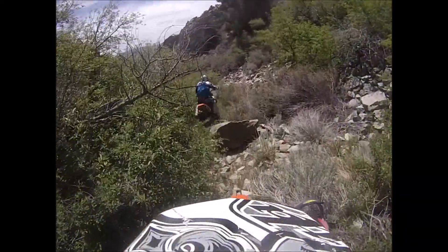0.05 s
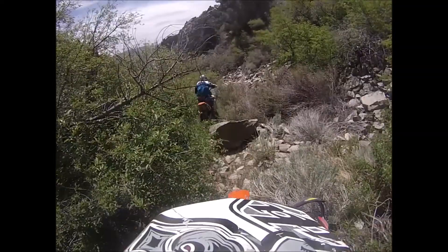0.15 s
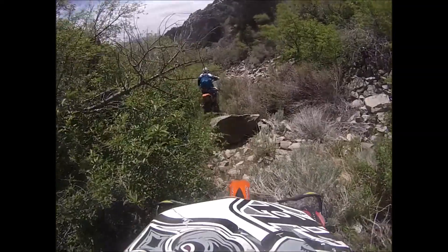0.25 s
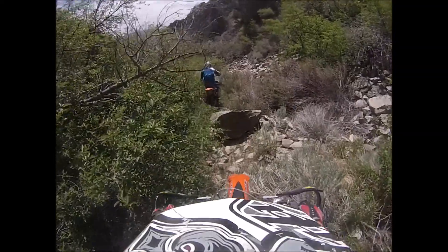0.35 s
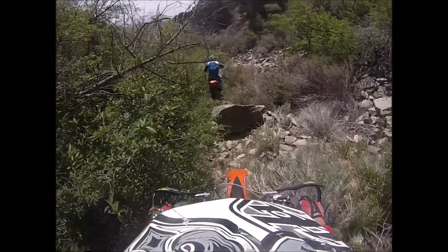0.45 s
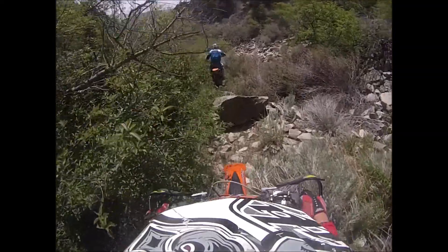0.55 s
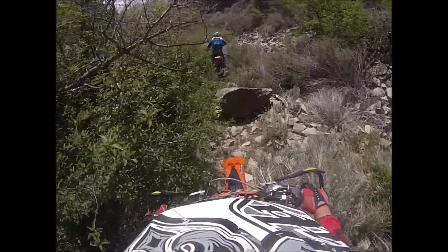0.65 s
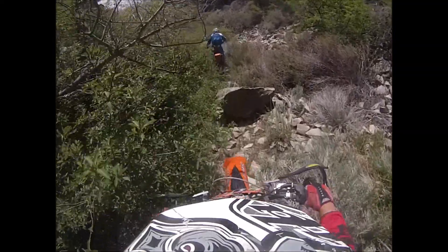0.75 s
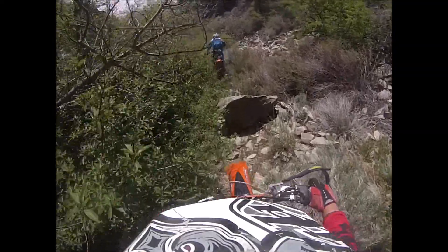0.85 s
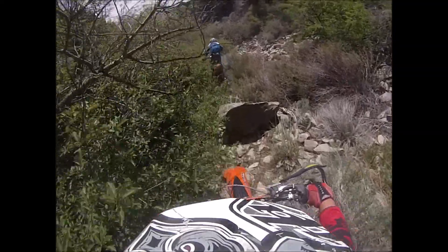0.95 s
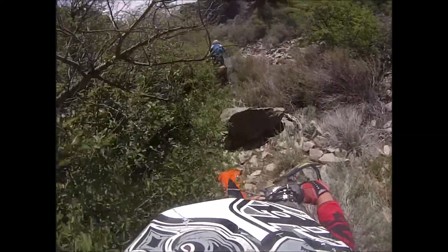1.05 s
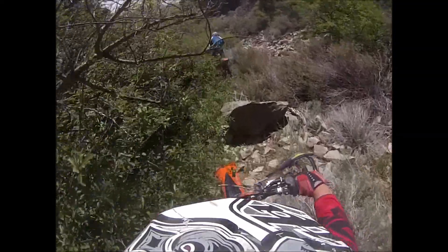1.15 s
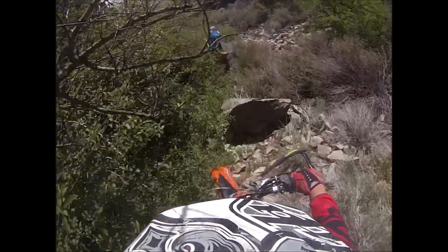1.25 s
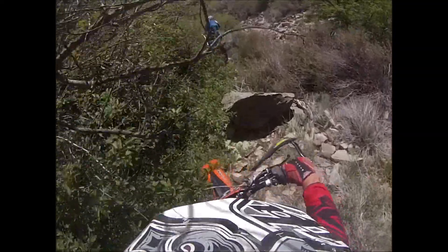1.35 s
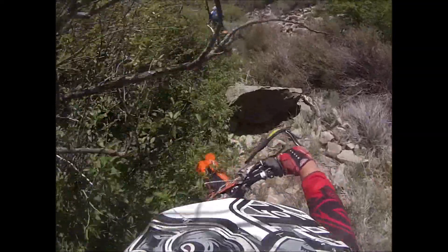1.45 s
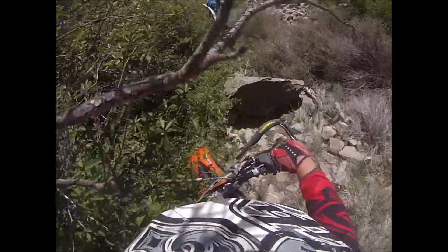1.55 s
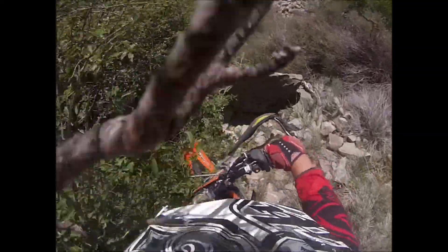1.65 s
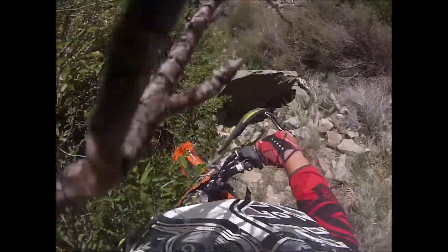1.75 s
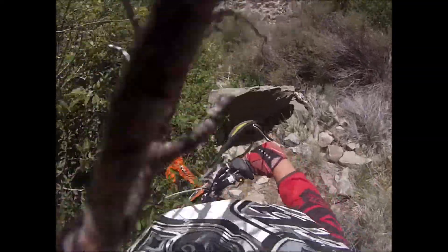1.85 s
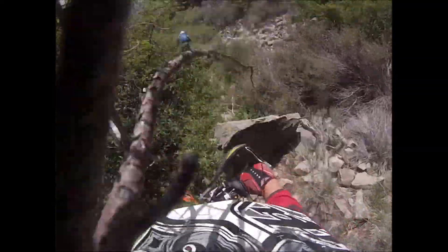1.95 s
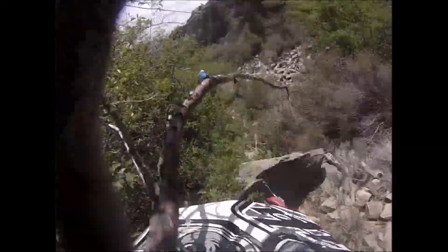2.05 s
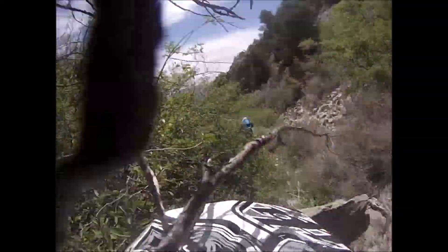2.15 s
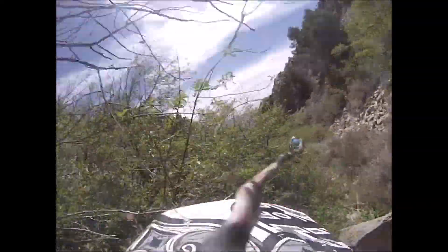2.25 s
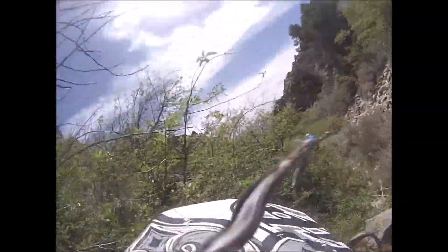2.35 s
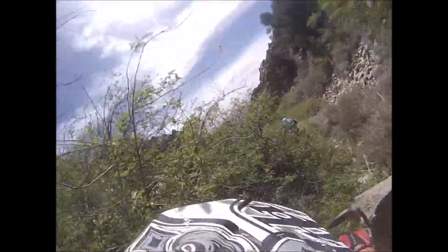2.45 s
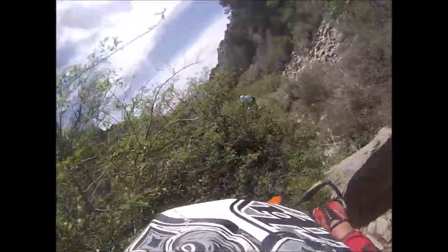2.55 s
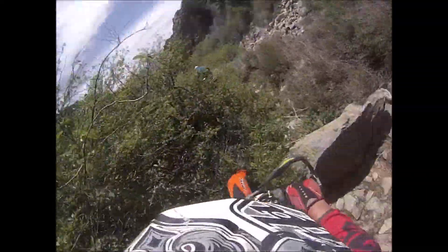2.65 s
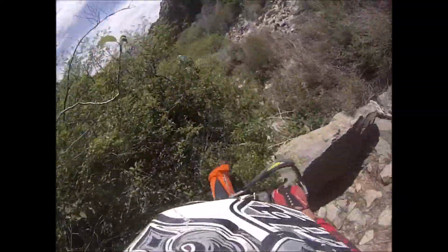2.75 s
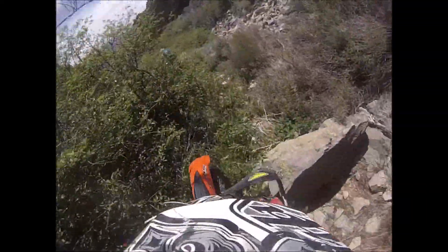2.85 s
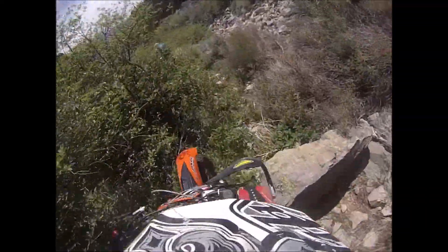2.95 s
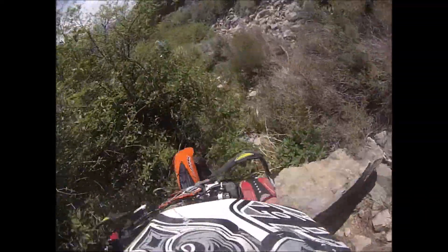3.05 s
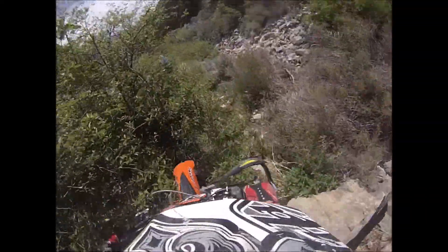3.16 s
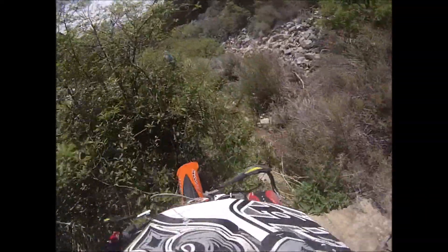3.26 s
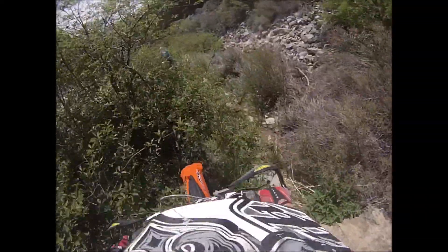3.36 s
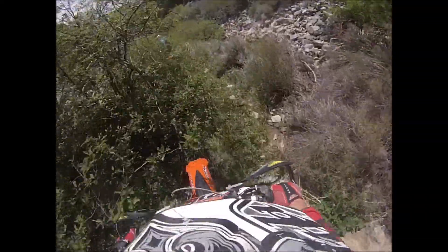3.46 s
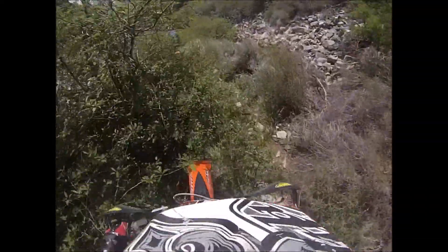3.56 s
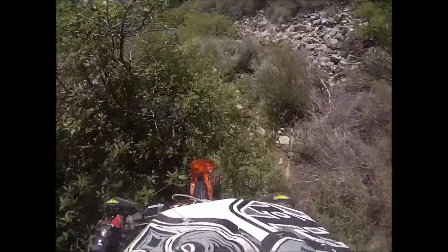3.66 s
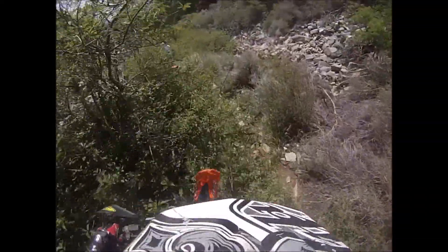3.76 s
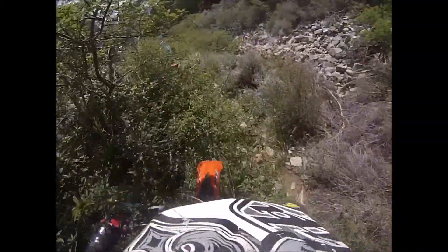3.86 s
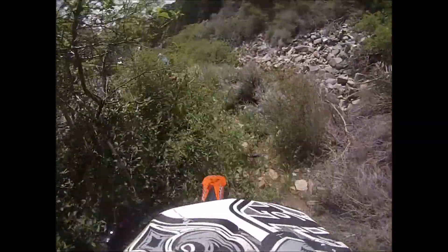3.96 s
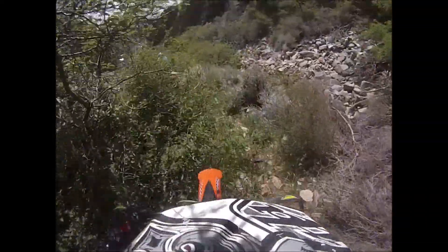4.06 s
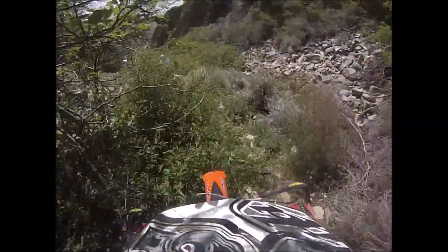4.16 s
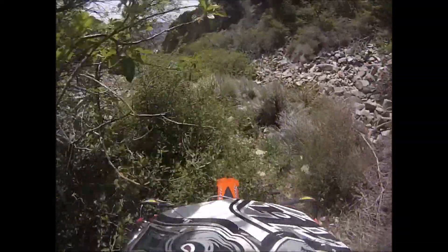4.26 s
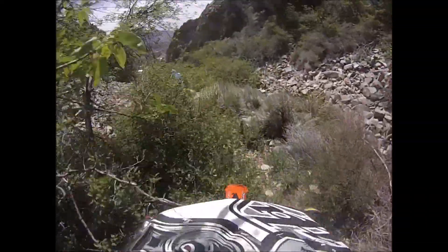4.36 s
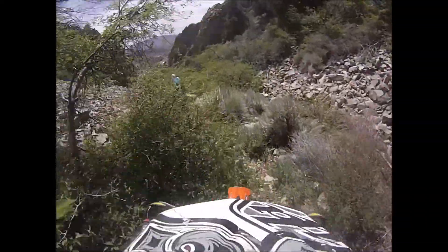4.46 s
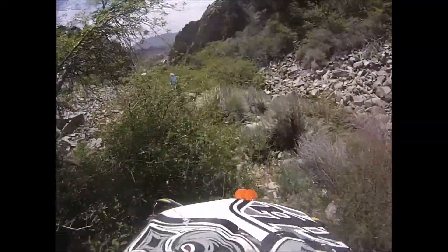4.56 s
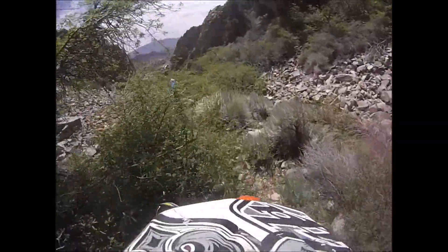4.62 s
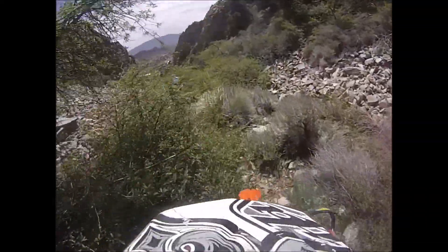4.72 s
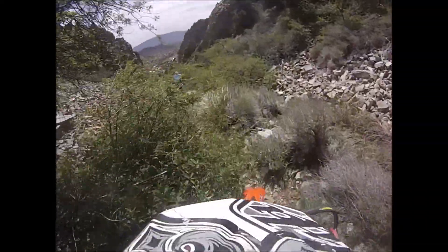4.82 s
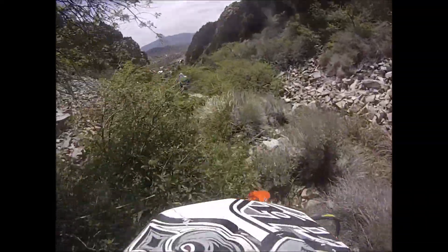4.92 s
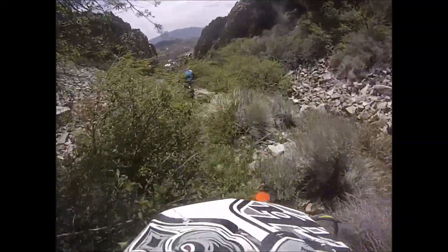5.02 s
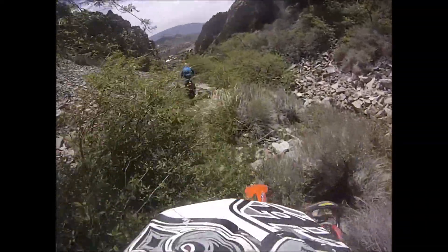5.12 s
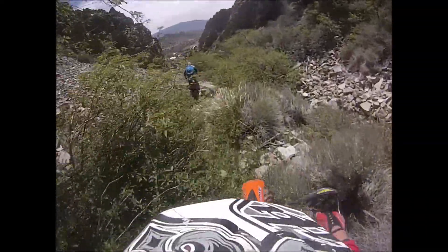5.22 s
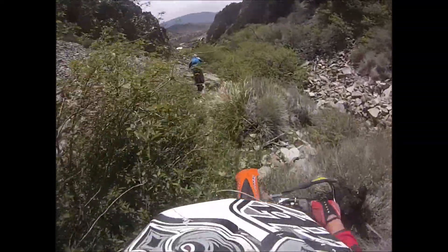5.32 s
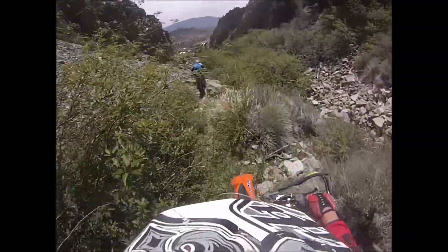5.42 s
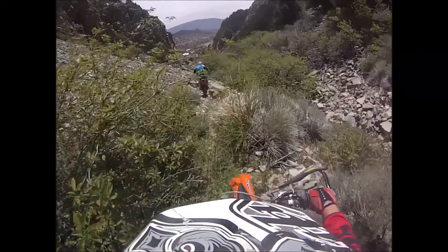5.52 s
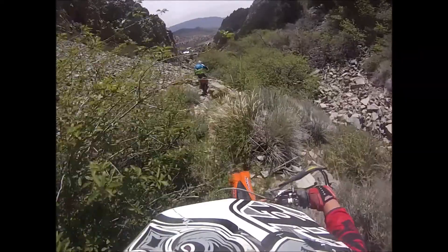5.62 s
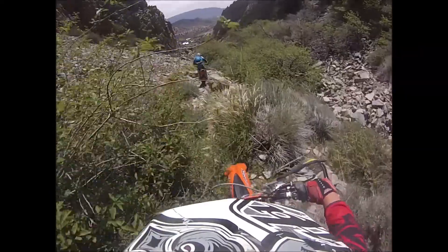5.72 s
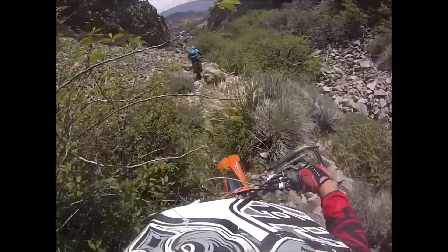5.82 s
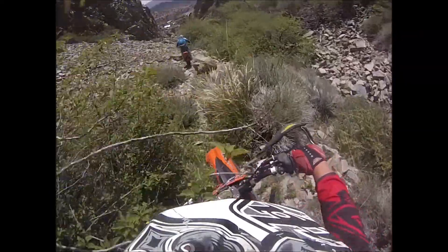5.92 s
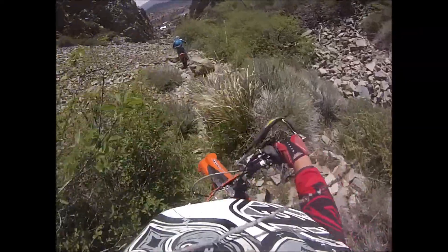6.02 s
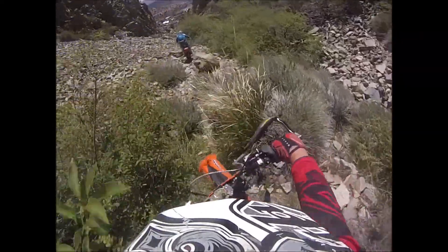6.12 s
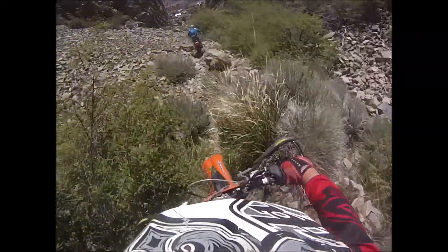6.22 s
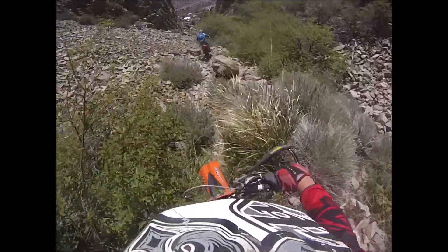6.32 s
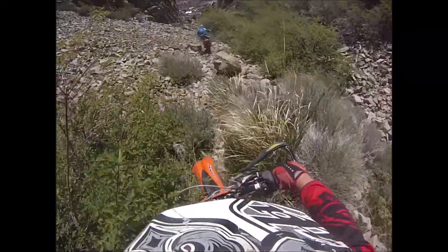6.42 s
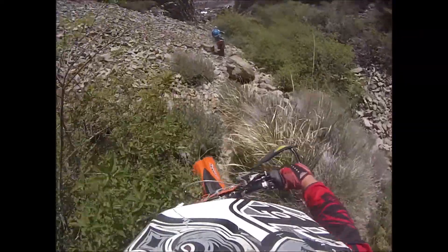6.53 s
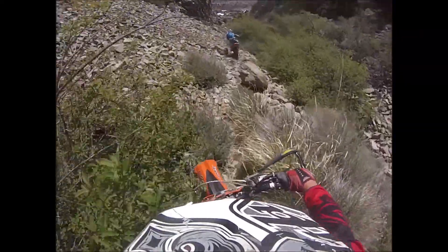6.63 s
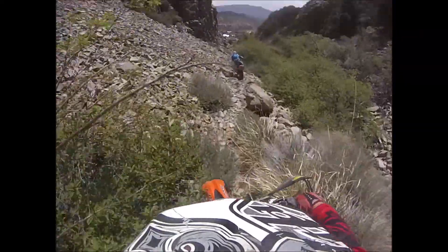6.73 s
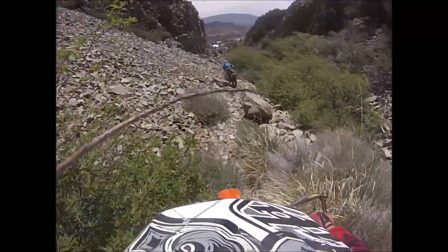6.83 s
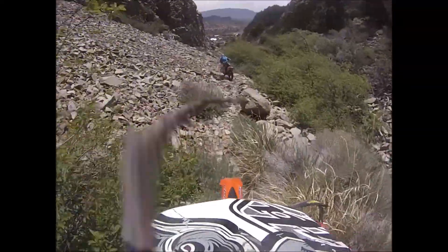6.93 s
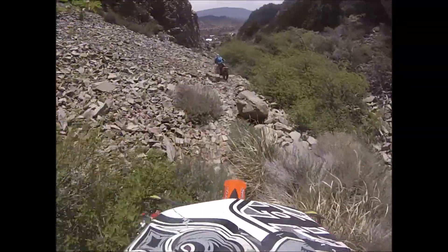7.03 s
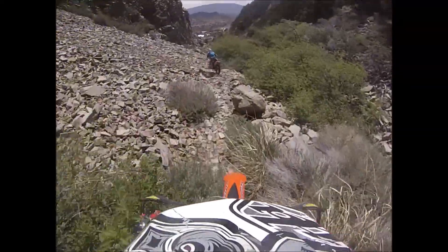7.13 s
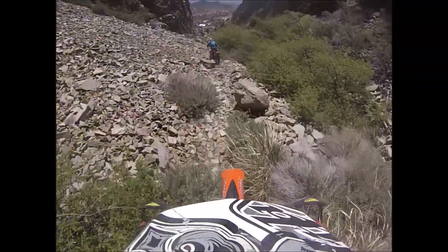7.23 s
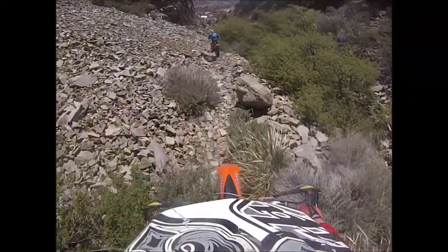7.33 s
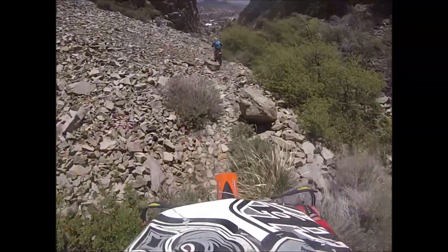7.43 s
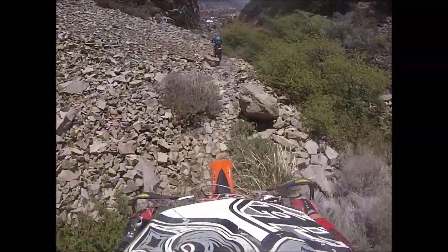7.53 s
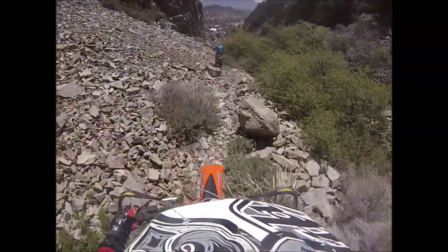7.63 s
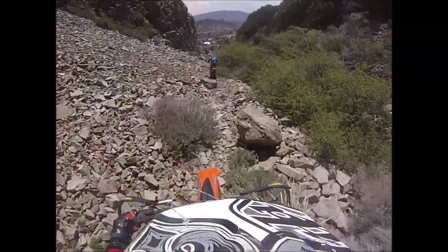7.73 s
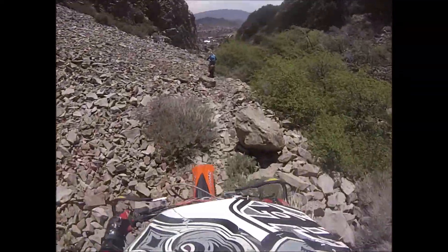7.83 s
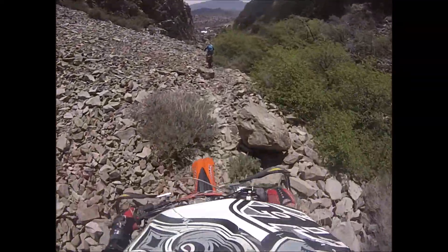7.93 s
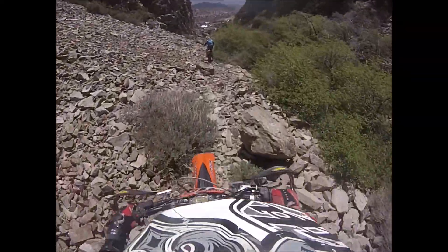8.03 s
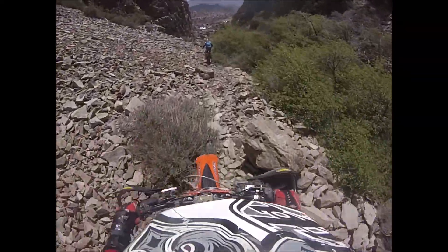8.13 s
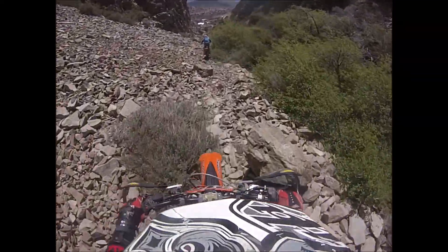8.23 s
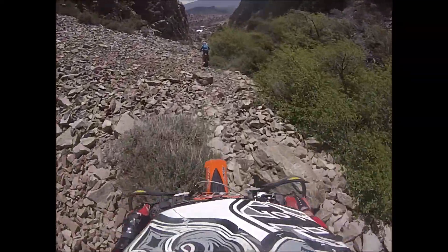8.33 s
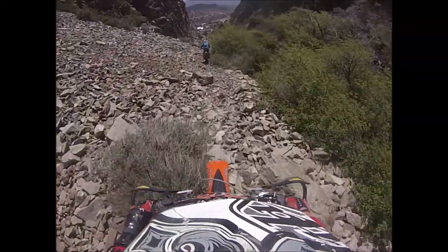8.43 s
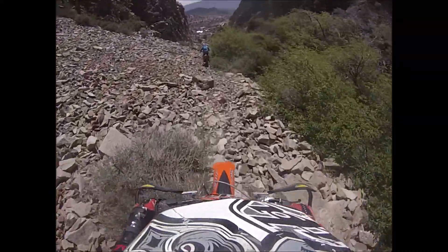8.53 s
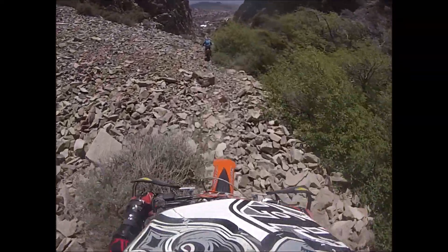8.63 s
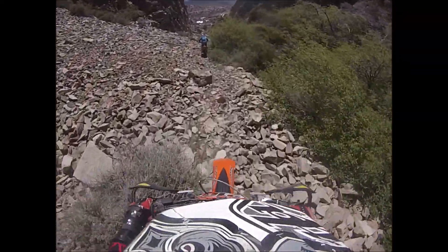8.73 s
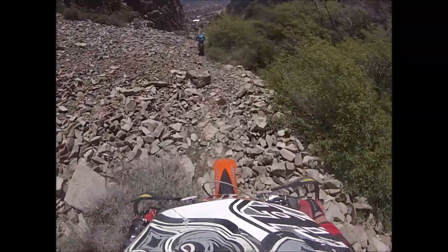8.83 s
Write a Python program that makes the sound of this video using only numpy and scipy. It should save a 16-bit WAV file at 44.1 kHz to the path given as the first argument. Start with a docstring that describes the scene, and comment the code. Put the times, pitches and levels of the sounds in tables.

```python
"""On an overgrown rocky trail, a two-stroke dirt bike creeps along, heard from a camera on the rider's helmet.
The engine burbles on short blips of throttle and pops unevenly: pulses ring its pipe and noise its casing.
Branches knock, thud and scrape on helmet and camera housing: short contacts ring them, or make them judder.
Leaves swish past as shaped noise with tiny snaps, small stones and loose metal tick, and air buffets the mic."""
import sys
import numpy as np
from scipy import signal
from scipy.fft import rfft, irfft
from scipy.io import wavfile
from scipy.ndimage import uniform_filter1d, minimum_filter1d

SR = 44100
rng = np.random.default_rng(int(sys.argv[2]) if len(sys.argv) > 2 else 0)


def dump_mix(stems):
    """Bounce the given channels to the path in sys.argv[1] as a 16-bit WAV at rate SR."""
    frames = np.atleast_2d(stems).T  # one column per channel
    limited = np.clip(frames, -1, 1)  # hard clip at full scale
    pcm = np.round(limited * 32767).astype(np.int16)
    wavfile.write(sys.argv[1], SR, pcm)


N = 391608
TIME = np.arange(N) / SR


def from_db(db):
    """Turn decibels into a gain."""
    return 10 ** (np.asarray(db) / 20)


def to_db(gain):
    """Turn a gain into decibels."""
    return 20 * np.log10(gain + 1e-9)


def rms_one(x):
    """Scale a sound to unit power."""
    return x / np.sqrt(np.mean(x ** 2) + 1e-20)


def passed(x, hz, kind, order=2):
    """Keep only what lies below ("low") or above ("high") a frequency."""
    return signal.sosfilt(signal.butter(order, min(hz, .45 * SR), kind, fs=SR, output="sos"), x)


def drift(rate):
    """Random wandering of spread 1, with `rate` new values a second joined by straight lines."""
    return rms_one(np.interp(TIME * rate, np.arange(9000), rng.standard_normal(9000)))


def coloured(spectrum):
    """Noise of unit power shaped by a list of (frequency [Hz], level [dB per Hz])."""
    hz, db = np.transpose(spectrum)
    log_hz = np.log(np.fft.rfftfreq(N, 1 / SR) + 1e-3)
    gain = from_db(np.interp(log_hz, np.log(hz), db))
    return rms_one(irfft(rfft(rng.standard_normal(N)) * gain, N))


def resonate(x, modes):
    """Ring resonances (frequency [Hz], width [Hz], level [dB]) side by side, with alternating sign."""
    out = 0
    for k, (hz, width, db) in enumerate(modes):
        r = np.exp(-np.pi * width / SR)
        poles = [1, -2 * r * np.cos(2 * np.pi * hz / SR), r * r]
        gain = (-1) ** k * from_db(db) * (1 - r * r) / 2
        out = out + gain * signal.lfilter([1, 0, -1], poles, x + 1e-18)
    return out


def evened(x, span_s):
    """Hold the power at 1 over a sliding span."""
    power = uniform_filter1d(x ** 2, max(int(span_s * SR), 2))
    return x / np.sqrt(np.abs(power) + 1e-14)


def add(out, s, sound, peak_db):
    """Place a sound at a time with a given peak."""
    at = max(round(s * SR), 0)
    out[at:at + len(sound)] += (from_db(peak_db) * sound / np.abs(sound).max())[:N - at]


def swells(starts, lengths, heights, attack_s, release_s):
    """Each event rises to its height by its start, holds for its length and dies away; the strongest prevails."""
    out = np.zeros(N)
    for s, length, height in zip(starts, lengths, heights):
        rising = np.maximum(s - TIME, 0) ** 2 * 2 / attack_s ** 2
        falling = np.maximum(TIME - s - length, 0) / release_s
        out = np.maximum(out, height * np.exp(-np.minimum(rising + falling, 40)))
    return out


def bumpy_level(events, column, steady_db, attack_s, release_s):
    """Level in dB of a steady bed with one column of an event table swelling over it."""
    rows = np.transpose(events)
    bumps = swells(rows[0], rows[1], from_db(rows[column]), attack_s, release_s)
    return to_db(np.hypot(from_db(steady_db), bumps))


def ticking(t, ticks_per_s, fade_s):
    """A first contact and a dying run of smaller, uneven ones."""
    happens = rng.random(len(t)) < ticks_per_s / SR
    later = happens * rng.uniform(-0.83, 1, len(t)) * np.exp(-t / fade_s)
    return (t == 0) + later


# blips of throttle: (time [s], length [s], top speed [revolutions per s], exhaust level [dB],
# misfiring added to that of the idling engine [0-1], airbox level [dB])
THROTTLE_BLIPS = [(0, 0.096, 47.2, -62, 0.36, -68), (1.33, 0.32, 41, -44.5, 0.38, -56),
                  (1.7, 0.77, 55.4, -33, 0.4, -72), (2.66, 0.15, 53.5, -46, 0, -39.5),
                  (3.23, .17, 49.1, -41.5, 0.25, -48), (3.56, 0.084, 43.5, -68, 0.2, -54),
                  (3.8, .16, 58.5, -42.5, 0.23, -48.5), (6.02, 0.28, 54, -39.5, .25, -46),
                  (7.135, .2, 48.4, -40.5, 0.31, -55.5), (8.18, 0.21, 44.2, -44, 0.28, -55)]
IDLE_REV_PER_S, COAST_S = 28, .41


def engine_speed():
    """Each blip pulls the engine up to its top speed, fast at first; then it coasts back towards idle."""
    speed = np.full(N, float(THROTTLE_BLIPS[0][2]))
    for s, length, top, *_ in THROTTLE_BLIPS:
        before = np.interp(s, TIME, speed)
        fall = np.exp(-np.maximum(TIME - s - length, 0) / COAST_S)
        coasting = IDLE_REV_PER_S + (top - IDLE_REV_PER_S) * fall
        pulling = before + (top - before) * np.sin(np.pi / 2 * (TIME - s) / length)
        after = np.where(TIME < s + length, pulling, coasting)
        speed = np.where(TIME < s, speed, after)
    return speed


THROTTLE_OPEN_S, THROTTLE_SHUT_S = 0.016, 0.0096
IDLE_DB, DB_PER_REV_PER_S = -55, 0.1774   # exhaust with the throttle shut, and its rise with speed
IDLE_MISFIRING, MISFIRING_FADE_REV_PER_S = 0.46, 14   # firing steadies above idle


def throttle(above_idle):
    """Exhaust level and misfiring follow from the engine's speed and the blips."""
    s, length, _, open_db, stumble, _ = np.transpose(THROTTLE_BLIPS)
    shut = from_db(IDLE_DB + DB_PER_REV_PER_S * above_idle)
    opened = swells(s, length, from_db(open_db), THROTTLE_OPEN_S, THROTTLE_SHUT_S)
    misfiring = swells(s, length, stumble, THROTTLE_OPEN_S, THROTTLE_SHUT_S)
    misfiring = misfiring + IDLE_MISFIRING * np.exp(-above_idle / MISFIRING_FADE_REV_PER_S)
    return to_db(np.hypot(shut, opened)), misfiring


def scattered(x, decay_s=0.007, share=0.6):
    """Ground and rocks nearby add a short cloud of echoes."""
    t = TIME[:SR // 12]
    cloud = rng.standard_normal(len(t)) * np.exp(-t / decay_s) * (t > .003)
    return x + share * signal.fftconvolve(x, cloud / np.linalg.norm(cloud))[:N]


# exhaust pipe resonances: (frequency [Hz], width [Hz], level [dB])
PIPE_RESONANCES = [(97, 16, 4), (163, 24, 0), (218, 42, 0), (337, 34, -3.5), (388, 43, -7), (459, 39, -4.5),
                   (650, 1100, -19.5)]


def exhaust(turns, exhaust_db, misfiring, swell=2.3):
    """One pressure pulse a revolution rings the pipe."""
    # a misfiring engine burns early or late, weakly or hard
    misfiring = np.clip(misfiring, .05, 1)
    timing = .012 * drift(25) + .14 * misfiring ** 2 * drift(40)
    burn = np.maximum.accumulate(turns + timing)
    strength = from_db((1.2 + 3.5 * misfiring) * drift(60))
    fired = np.diff(np.floor(burn), prepend=0) * strength
    # each pulse starts a fading hiss, stronger when misfiring
    fired = fired + .04 * misfiring * rng.standard_normal(N) * np.exp(-6 * (burn % 1))
    # under load the pipe's main resonance swells
    load = np.clip((exhaust_db + 50) / 7, 0, 1)
    pipe = resonate(fired, PIPE_RESONANCES) + swell * load * resonate(fired, [(230, 34, 1)])
    tone = passed(passed(scattered(pipe), 790, "low"), 51, "high")
    return from_db(exhaust_db) * evened(tone, 0.19)


def hum(turns, speed, resonances, count=18):
    """Multiples of the engine speed, from the third up, glide through fixed resonances, each fluttering a little."""
    hz, db = np.transpose(resonances)
    out = 0
    for k in range(3, count):
        level_db = np.interp(k * speed, hz, db) + 2 * drift(18)
        phase = k * turns + rng.random() + .04 * drift(30)
        out = out + from_db(level_db) * np.sin(2 * np.pi * phase)
    return out


# how strongly the hum sounds with the throttle open: (frequency [Hz], level [dB])
AIRBOX_RESPONSE = [(100, -7), (150, -9), (200, -11), (230, -0.5), (260, -5.5), (300, -7), (350, -11),
                   (405, 10.5), (450, -18), (510, -11.5), (560, -18), (660, -5.5), (730, -23), (1000, -32)]
# the same with the throttle shut: (frequency [Hz], level [dB])
OVERRUN_RESPONSE = [(100, -11), (150, -12), (185, -3), (235, -0.5), (290, -8), (350, -8), (405, -3.5),
                    (460, -3.5), (520, -19.5), (1000, -38)]
AIRBOX_FADE_S = 0.12   # the airbox hums on after a blip
OVERRUN_DB, OVERRUN_DB_PER_REV_PER_S = -62.5, 0.5853   # coasting hum at idle speed, and its rise with speed


def intake(turns, speed, build_s=0.05):
    """The airbox sings as a blip builds up; coasting down, the engine keeps a softer, lower hum."""
    s, length, _, _, _, airbox_db = np.transpose(THROTTLE_BLIPS)
    opened = swells(s + build_s, length - build_s, from_db(airbox_db), build_s, AIRBOX_FADE_S)
    shut = from_db(OVERRUN_DB + OVERRUN_DB_PER_REV_PER_S * (speed - IDLE_REV_PER_S))
    return opened * hum(turns, speed, AIRBOX_RESPONSE) + shut * hum(turns, speed, OVERRUN_RESPONSE)


THROB_DB, THROB_DB_PER_REV_PER_S = -58, 0.98   # beat at idle, and its rise with speed


def throb(turns, above_idle):
    """The exhaust's deep beat, one swing a revolution, grows with speed."""
    level_db = THROB_DB + THROB_DB_PER_REV_PER_S * above_idle + 2 * drift(17)
    return from_db(level_db) * np.sin(2 * np.pi * turns)


# single late firings: (time [s], peak level [dB])
LATE_FIRINGS = [(0.107, -38), (.142, -37), (0.608, -34.5), (0.872, -35), (1.174, -46), (1.353, -39),
                (1.402, -46), (3.228, -36), (3.318, -26.5), (4.122, -32), (4.526, -34.5), (4.7, -35),
                (4.797, -36.5), (4.855, -37), (5.269, -42), (5.61, -32), (5.681, -40), (5.791, -34),
                (6.837, -27), (6.929, -37), (8.025, -34), (8.562, -33.5), (8.775, -33.5)]
# how the pipe rings after a pop: (frequency [Hz], width [Hz], level [dB])
POP_RESONANCES = [(209, 24, 3), (332, 60, 7.5), (372, 40, 5), (470, 36, 0), (670, 140, -18.5)]


def pops(echo_s=0.0104, echo=0.08, rough=0.18, puff_s=0.0051):
    """Unburnt charge lights in single pops, each thrown back by the ground."""
    out, t = np.zeros(N), TIME[:SR // 10]
    for s, db in LATE_FIRINGS:
        blast = (t == 0) + rough * rng.standard_normal(len(t)) * np.exp(-t / puff_s)
        blast[int(echo_s * SR * rng.uniform(.8, 1.2))] += echo
        add(out, s, passed(resonate(blast, POP_RESONANCES), 1600, "low"), db)
    return out


# cylinder and casing resonances: (frequency [Hz], width [Hz], level [dB])
CASING_RESONANCES = [(816, 236, -5), (1159, 122, 1.5), (1480, 124, 7), (1620, 225, 2), (1970, 260, -12),
                     (2050, 310, -14.5), (2330, 213, 3), (2640, 68, -12.5), (2953, 34, -7),
                     (3720, 81, -13.5), (4007, 78, -8), (4800, 890, -30), (5720, 2000, -28),
                     (7000, 600, -41)]
# bushes sweeping along the bike: (time [s], length [s], leaves level [dB], rattle of the bike [dB])
BUSH_SWEEPS = [(.8, 0.093, -66, -55), (1.43, 0.51, -62, -54.5), (2.7, 0.27, -60, -49),
               (3.2, 0.16, -62, -47.5), (3.6, 0.45, -64, -54), (4.2, 0.12, -57, -56), (4.4, 0.66, -64, -56),
               (5.1, 1, -69, -53), (6.0, 0.4, -59, -43.5), (6.76, 0.18, -55.5, -48),
               (7.0, 0.19, -57.5, -49), (8.27, 0.73, -73, -53)]
BUSH_ATTACK_S, BUSH_RELEASE_S = 0.06, 0.096
CLATTER_DB, CLATTER_DB_PER_REV_PER_S = -53, 0.2238   # casing at idle, and its rise with speed


def clatter(turns, above_idle, slap=0.38, slap_turns=0.86, churn_db=-12):
    """Piston slap twice a revolution and the steady churn of gears and chain shake the casing."""
    casing_db = CLATTER_DB + CLATTER_DB_PER_REV_PER_S * above_idle
    clatter_db = bumpy_level(BUSH_SWEEPS, 3, casing_db, BUSH_ATTACK_S, BUSH_RELEASE_S)
    beat = 1 + slap * np.exp(-(2 * turns % 1) / slap_turns) * from_db(5 * drift(50))
    shake = rng.standard_normal(N) * beat * from_db(2.3 * drift(120))
    # as bike and helmet sway, each resonance swells and fades on its own
    rings = 0
    for k, mode in enumerate(CASING_RESONANCES):
        rings = rings + (-1) ** k * resonate(shake, [mode]) * from_db(1.8 * drift(9))
    casing = rms_one(passed(rings, 6150, "low"))
    churn = coloured([(60, -61), (140, 11.5), (240, 9.0), (450, -7), (600, -1.0), (900, -1.0), (2000, -52.0)])
    return from_db(clatter_db) * (casing + from_db(churn_db) * churn)


# camera housing resonances: (frequency [Hz], width [Hz], level [dB])
HOUSING_RESONANCES = [(700, 56, 5.5), (1219, 112, 6.5), (1474, 139, 10.5), (1800, 800, -10.5),
                      (2070, 120, 5.5), (2418, 123, 5.5), (2870, 53, -1.5), (3500, 390, -8.5),
                      (3940, 146, -1), (4720, 410, -8.5), (5630, 250, -9), (6700, 1500, -21),
                      (7500, 310, -16.5), (9640, 2000, -29), (11600, 1900, -26)]


def touched(detune, uneven_db):
    """The housing's resonances as one point of contact finds them: a little shifted, some stronger than others."""
    modes = []
    for hz, width, db in HOUSING_RESONANCES:
        shifted_hz = hz * np.exp(detune * rng.standard_normal())
        modes.append((shifted_hz, width, db + uneven_db * rng.standard_normal()))
    return modes


# twigs striking the camera housing:
# (time [s], peak level [dB], slip time [s], brightness [dB], twig ring [Hz])
TWIG_KNOCKS = [(0.146, -33, 0.0039, -9, 1570), (0.288, -32, 0.12, -14, 1510),
               (1.118, -35, 0.0081, -9, 1380), (1.6699, 13.5, 0.00071, 4, 2050),
               (1.755, -15, .0025, 3, 2480), (1.784, -5.5, 0.0038, 8, 2370), (1.802, -3, 0.0064, 6.5, 1345),
               (1.87, -8.5, 0.0016, -15, 2600), (1.8956, -1.5, 0.0014, 15, 1110),
               (1.913, -12, 0.0036, 6, 4400), (1.94, 2, 0.0053, 4.5, 1050), (1.9753, 2, 0.0015, -19, 910),
               (2.01, -6, 0.0028, -17, 2460), (2.032, 0, 0.0047, 16, 1190), (2.059, -4.5, 0.013, 6, 1540),
               (2.113, -1.5, 0.0069, 3, 2180), (2.119, 0, 0.0056, 13, 1070),
               (2.214, -3.5, 0.0023, 11, 2310), (2.234, 9.5, 0.0012, -1, 3500),
               (2.24, 13, 0.0031, 11.5, 2330), (2.251, 3, 0.0026, 2, 1710), (2.287, -6, 0.0022, -3, 2000),
               (2.296, 2, 0.0018, -6, 1830), (2.315, -1, 0.0082, -6, 1750),
               (2.3556, 3.5, 0.0077, -12, 2120), (2.368, -4.5, 0.0025, 9, 1700),
               (2.406, -7.5, 0.011, -8, 1610), (2.418, 0, 0.0046, -5, 1930),
               (2.427, -4.5, 0.0034, -15, 1310), (2.471, -4, 0.0068, 4, 1690), (2.486, -7, 0.004, -3, 1440),
               (2.493, -8, 0.0063, -5, 1550), (2.509, -0.5, 0.0028, -8, 1550),
               (2.5299, 4, 0.0028, -2, 1620), (2.548, -3, 0.0014, 5, 1400), (2.717, -22, 0.0036, 13, 1200),
               (3.597, -26.5, 0.0036, -3, 1405), (3.799, -13, 0.0041, -19, 2180),
               (6.05, -16.5, 0.0012, 0, 1400), (6.0739, -3, 0.0024, -9, 2250),
               (6.082, -24, .002, -10, 4370), (6.087, -9.5, 0.005, -18, 1940),
               (6.119, -10.5, 0.0019, -24, 1320), (6.126, -8.5, 0.002, -13, 2300),
               (6.163, -13, 0.0015, 17, 2200), (6.186, -12.5, 0.012, 8, 1550),
               (6.199, -15, 0.0021, 18, 2300), (6.235, -8.5, 0.002, -16, 1490),
               (6.2441, -1.5, 0.0051, 7, 1340), (6.2511, -3.5, 0.0052, -4, 1404),
               (6.264, -11.5, 0.011, -15, 2370), (6.283, -5, 0.002, 2, 1620), (6.29, 0, 0.0037, -23, 1530),
               (6.2962, -2, 0.0037, 23, 1480), (6.386, -18, 0.028, 4, 2320),
               (6.831, -25.5, 0.027, -27, 2320), (7.056, 1.5, 0.0038, 8, 1436),
               (7.0593, 1.5, 0.008, 10, 2460), (7.0795, 1, 0.00063, -2, 2350),
               (7.116, -21.5, 0.01, 1.5, 1430), (8.817, -26, 0.0056, -6, 2160)]


def knocks(first_slip=3.8, twig_db=10.0, low_cut_hz=1150, crack_db=-13, shudder=0.043, shudder_s=0.011):
    """A twig hits the housing and skids on briefly; each contact favours other resonances."""
    out, t = np.zeros(N), TIME[:SR // 4]
    for s, db, slip_s, bright_db, twig_hz in TWIG_KNOCKS:
        # the twig presses evenly, springs free and leaves the housing shuddering
        pressure = np.maximum(np.exp(-(t / slip_s) ** 2 / 2), shudder * np.exp(-t / shudder_s))
        skid = rng.standard_normal(len(t)) * from_db(2 * rng.standard_normal(len(t))) * pressure
        blow = skid + first_slip * (t == 0)
        shell = resonate(blow, touched(detune=.02, uneven_db=2.2))
        shell = passed(passed(shell, 11300, "low", order=3), low_cut_hz, "high", order=5)
        # a sharp contact rings the housing's high modes; a blunt one mostly the twig
        dull = passed(shell, 3740, "low", order=1)
        bright = from_db(bright_db) * (shell - dull)
        twig = resonate(blow, [(twig_hz, twig_hz / 5, twig_db)])
        twig = resonate(twig, [(twig_hz, twig_hz / 2, 0)])
        # the dry crack of the wood itself fills in between the resonances
        crack = from_db(crack_db) * passed(passed(blow, 470, "high"), 1720, "low")
        add(out, s, passed(dull, 6500, "low") + bright + twig + crack, db)
    return out


# heavier blows on the helmet: (time [s], peak level [dB], ring [Hz], cycles rung [count])
HELMET_BLOWS = [(1.657, -9.5, 357, 0.82), (1.6622, 1, 389, 1.5), (1.669, 14.5, 95, 0.6),
                (1.898, -5.5, 107.3, 1.2), (1.9, 4, 370, 0.43), (1.942, 2.5, 132, 0.83),
                (1.945, 0.5, 534, 2), (1.975, -1.5, 467, 2.2), (2.034, 10, 133, 0.63),
                (2.037, -12, 302, 1.3), (2.119, 5.5, 198, 0.28), (2.122, -4.5, 477, 0.61),
                (2.229, 11, 111, 1.1), (2.243, 4, 650, 0.97), (2.216, -4, 950, 2), (2.252, -3, 855, 2),
                (2.418, -15.5, 685, 5.3), (2.474, -18, 760, 1.8), (2.531, -14, 940, 1.7),
                (2.533, -10, 100.6, 3.9), (3.799, -27, 300, 0.71), (3.8, -28, 680, 2.1),
                (6.051, -4, 144, 1.8), (6.056, -12, 437, 3.6), (6.075, -9.5, 614, 2.3),
                (6.085, -16, 228, 2.6), (6.121, -9.5, 189, 0.99), (6.121, -8.5, 419, 5.8),
                (6.164, -15, 480, 2.8), (6.194, -20.5, 442, 18), (6.2, -25, 706, 11),
                (6.236, -12, 462, 2.2), (6.246, -19.5, 273, 2.4), (6.39, -28, 810, 8),
                (7.057, -23.5, 618, 2.86)]


def thuds(crunch=0.24, crunch_s=0.0046):
    """A heavy branch flexes the helmet shell, which swings and dies away while bark crunches."""
    out, t = np.zeros(N), TIME[:SR // 8]
    for s, db, hz, cycles in HELMET_BLOWS:
        swing = np.sin(2 * np.pi * hz * t) * np.exp(-t * hz / cycles)
        bark = rms_one(passed(rng.standard_normal(len(t)), 580, "low", order=4)) * np.exp(-t / crunch_s)
        add(out, s, passed(swing + crunch * bark, max(1.27 * hz, 420), "low", order=4), db)
    return out


# branches dragging over the helmet:
# (time [s], length [s], rasp level [dB], shell drone level [dB], judder [Hz])
BRANCH_DRAGS = [(1.699, 0.14, -26.5, -12.5, 86), (1.874, 0.26, -20, -6, 72), (2.067, .12, -26.5, -7.5, 97),
                (2.215, 0.087, -12.5, -1, 101), (2.333, 0.069, -21, -12.5, 94),
                (2.432, 0.068, -28.5, -21.5, 100), (2.517, 0.0098, -25, -9, 101),
                (6.064, 0.042, -36, -12, 125), (6.15, 0.17, -31.5, -26, 135)]
DRAG_ATTACK_S, DRAG_RELEASE_S = 0.0069, 0.013


def dragging(slips_per_s=3000, patchy_db=3.0, waver=0.0556, growl_share=0.21, rasp_top_hz=7000, rasp_low_hz=1050):
    """Bark sticks and slips: dense uneven slips crackle in the housing while the helmet shell judders."""
    s, length, rasp_db, drone_db, judder_hz = np.transpose(BRANCH_DRAGS)
    rasping = swells(s, length, from_db(rasp_db), DRAG_ATTACK_S, DRAG_RELEASE_S)
    droning = swells(s, length, from_db(drone_db), DRAG_ATTACK_S, DRAG_RELEASE_S)
    sizes = from_db(4 * np.minimum(rng.exponential(1, N), 4)) * rng.choice([-1, 1], N)
    slips = sizes * (rng.random(N) < slips_per_s / SR)
    # several twigs share the work, each with its own point of contact, and take turns in front
    twig = rng.integers(0, 5, N)
    rasp = 0
    for k in range(5):
        own_slips = slips * (twig == k) * from_db(5 * drift(60))
        rasp = rasp + resonate(own_slips, touched(detune=.07, uneven_db=3.5))
    rasp = passed(passed(rasp, rasp_top_hz, "low"), rasp_low_hz, "high", order=3)
    rasp = evened(rasp, 0.022) * from_db(patchy_db * drift(110))
    # the judder speed glides from one drag to the next and wavers
    judder = np.interp(TIME, s + length / 2, judder_hz) * (1 + waver * drift(70))
    swing = np.sin(2 * np.pi * np.cumsum(judder) / SR) * from_db(2.8 * drift(45))
    growl = resonate(slips, [(159.0, 26.0, 10.2), (399, 91, 3.3), (513, 180, 0.44), (954, 110, 0.5)])
    growl = rms_one(passed(growl, 460, "low"))
    return rasping * rasp + droning * (swing + growl_share * growl)


# a twig springing free leaves the metal camera mount ringing: (time [s], peak level [dB], favoured pitch [Hz])
MOUNT_PINGS = [(2.546, -24.5, 1330), (3.8, -26, 3900), (6.081, -24, 4270), (6.119, -17, 4200),
               (6.249, -10.5, 4200), (7.079, -14.5, 2500)]
# camera mount resonances: (frequency [Hz], width [Hz], level [dB])
MOUNT_RESONANCES = [(1330, 5.8, -6), (2580, 17, -6), (3200, 7.6, -14), (3540, 24, -5), (4130, 45, -7),
                    (4560, 33, -13), (5550, 12, -17)]


def pings(reach_octaves=0.9):
    """The mount rings on thinly, mostly in the modes near the one that the twig plucks."""
    out, click = np.zeros(N), TIME[:SR // 2] == 0
    for s, db, favoured_hz in MOUNT_PINGS:
        modes = []
        for hz, width, level in MOUNT_RESONANCES:
            distance = 4 * np.log2(hz / favoured_hz) / reach_octaves
            modes.append((hz, width, level - 10 * np.log10(1 + distance ** 2)))
        add(out, s, resonate(click, modes), db)
    return out


# chain and levers clack as the bike lurches: (time [s], peak level [dB], ring [Hz])
METAL_CLACKS = [(.297, -35.5, 1650), (.385, -39, 1600), (.72, -38, 2300), (.99, -36.5, 1500),
                (1.53, -35, 1500), (3.228, -33.5, 1570), (3.269, -34, 1520), (3.323, -29.5, 1600),
                (3.647, -34, 2300), (3.912, -35, 1480), (4.268, -36, 2300), (4.702, -35, 1560),
                (5.02, -39, 2250), (5.164, -39, 2170), (5.236, -38, 2320), (5.415, -39, 2270),
                (5.6, -36, 2280), (5.798, -37.5, 2270), (6.688, -39, 2270), (6.851, -21.5, 2400),
                (7.412, -43, 2280), (8.25, -36, 1520), (8.528, -36, 1590), (8.659, -42, 2300),
                (8.731, -30.5, 1490)]


def clacks(ticks_per_s=900, fade_s=0.0069, casing_db=-3):
    """Loose metal chatters briefly, ringing itself and the casing."""
    out, t = np.zeros(N), TIME[:SR // 12]
    for s, db, hz in METAL_CLACKS:
        chatter = ticking(t, ticks_per_s, fade_s)
        own = resonate(resonate(chatter, [(hz, hz / 6, 6)]), [(hz, hz, 0)])
        add(out, s, own + from_db(casing_db) * resonate(chatter, CASING_RESONANCES), db)
    return out


PEBBLES_PER_S = 7   # flicked against the bike by the tyres
PEBBLE_DB, PEBBLE_SPREAD_DB = -50, 3.5   # middle peak, and how far large and small ones lie from it


def pebbles(lowest_hz=1400, highest_hz=7000, cycles=2.5):
    """Small stones tick against the bike at random, each with two short rings; higher ones are fainter."""
    out, click = np.zeros(N), TIME[:SR // 40] == 0
    for when, smallness, upper in rng.random((int(PEBBLES_PER_S * N / SR), 3)):
        hz = lowest_hz * (highest_hz / lowest_hz) ** smallness
        rings = [(hz, hz / cycles / np.pi, 0), (hz * (1.2 + .6 * upper), hz / cycles, 0)]
        peak_db = PEBBLE_DB + PEBBLE_SPREAD_DB * (1 - 2 * smallness)
        add(out, when * TIME[-1], resonate(click, rings), peak_db)
    return out


# tone of the swishing leaves: (frequency [Hz], level [dB per Hz])
LEAF_SPECTRUM = [(600, 18), (1500, -59), (3500, 8), (6500, 3.5), (8500, -4.5), (12000, -5), (14000, -26),
                 (16000, -26)]
GRASS_DB = -65.5   # steady swish under the wheels


def leaves(snaps_per_s=120, snap_db=-11):
    """Foliage swishes along the bike, with tiny snaps of dry stalks."""
    leaves_db = bumpy_level(BUSH_SWEEPS, 2, GRASS_DB, BUSH_ATTACK_S, BUSH_RELEASE_S)
    swish = coloured(LEAF_SPECTRUM) * from_db(1.2 * drift(40))
    sizes = from_db(4 * np.minimum(rng.exponential(1, N), 3)) * rng.choice([-1, 1], N)
    snaps = sizes * (rng.random(N) < snaps_per_s / SR)
    snaps = resonate(snaps, [(4760, 930, 5.0), (7900, 330, -1.0), (10500, 2500, -14)])
    return from_db(leaves_db) * (swish + from_db(snap_db) * rms_one(snaps))


# dry stalks crackle against the bike: (time [s], peak level [dB])
STALK_CRACKLES = [(0.307, -53), (.576, -46), (.838, -41.5), (1.018, -49.5), (3.272, -44), (4.325, -42),
                  (4.64, -42), (4.778, -43), (5.101, -45), (5.172, -44.5), (5.231, -51), (5.542, -44),
                  (5.79, -48), (6.004, -43), (6.752, -43), (7.245, -47), (8.562, -45)]


def stalks(ticks_per_s=1500, fade_s=0.0089, centre_hz=5200, low_hz=2800, top_hz=8500):
    """A stalk splinters in a quick run of bright ticks."""
    out, t = np.zeros(N), TIME[:SR // 12]
    for s, db in STALK_CRACKLES:
        hz = centre_hz * rng.uniform(.75, 1.3)
        crackle = resonate(ticking(t, ticks_per_s, fade_s), [(hz, hz / 2, 0)])
        add(out, s, passed(passed(crackle, low_hz, "high"), top_hz, "low"), db)
    return out


# jolts over stones shove air at the microphone and make the helmet boom:
# (time [s], length [s], air level [dB], boom level [dB])
STONE_JOLTS = [(0, 0.52, -60, -43), (.78, 0.044, -53, -40.5), (1.05, 0.45, -36, -51),
               (1.64, 0.44, -30, -47), (2.7, 0.054, -26.5, -49), (2.98, 0.18, -24, -46.5),
               (3.27, 0.17, -26.5, -37), (3.6, .25, -32, -41.5), (3.89, 0.097, -22, -35.5),
               (4.05, 0.059, -21.5, -29.5), (4.16, 0.11, -30, -42), (4.47, 0.27, -31.5, -53),
               (4.83, 0.023, -28, -39), (5.05, 0.35, -30, -51.5), (6.11, 0.23, -16, -27),
               (6.4, 0.25, -27, -63), (6.81, 0.15, -22, -36), (7.08, 0.075, -28, -38.5),
               (7.56, 0.08, -24.5, -40), (7.76, 0.086, -29.5, -39.5), (8.12, 0.066, -32.5, -55),
               (8.42, 0.69, -29, -47)]
# tone of the buffeting air: (frequency [Hz], level [dB per Hz])
BUFFET_SPECTRUM = [(5, -1.5), (12, 16.5), (24, -1), (45, -1), (70, -17), (130, -43.5), (300, -33.5),
                   (800, -72.5)]
JOLT_ATTACK_S, JOLT_RELEASE_S = 0.091, 0.055
AIR_DB, BOOM_DB = -35.5, -52   # between jolts


def buffeting():
    """Lumpy air on the microphone, and the helmet booming as the bike jolts over stones."""
    air_db = bumpy_level(STONE_JOLTS, 2, AIR_DB, JOLT_ATTACK_S, JOLT_RELEASE_S)
    boom_db = bumpy_level(STONE_JOLTS, 3, BOOM_DB, JOLT_ATTACK_S, JOLT_RELEASE_S)
    air = evened(coloured(BUFFET_SPECTRUM), 0.127)
    boom = passed(resonate(rng.standard_normal(N), [(95.7, 14.7, 0)]), 170, "low", order=4)
    return from_db(air_db) * air + from_db(boom_db) * evened(boom, 0.11)


def scene():
    """Bike, trail and helmet together."""
    speed = engine_speed() * (1 + .007 * drift(9))   # never quite steady
    turns = np.cumsum(speed) / SR
    above_idle = speed - IDLE_REV_PER_S
    exhaust_db, misfiring = throttle(above_idle)
    engine = exhaust(turns, exhaust_db, misfiring) + intake(turns, speed) + throb(turns, above_idle)
    engine = engine + pops() + clatter(turns, above_idle)
    branches = knocks() + thuds() + dragging() + pings()
    trail = clacks() + pebbles() + leaves() + stalks()
    return (engine + branches + trail + buffeting())[None]


CUTOFF_HZ = 15800


def record(dry, threshold_db=-20, squeeze=0.6, release_db_per_s=130, attack_s=0.0075, hold_s=0.05):
    """Gain control ducks after loud blows, holds and recovers; peaks clip and the top is cut."""
    power = signal.lfilter([1 / 300], [1, 1 / 300 - 1], dry[0] ** 2)
    level_db = 10 * np.log10(np.abs(power) + 1e-12)
    # the loudest level lately is held, then let down at a steady rate
    half = int(hold_s * SR / 2)
    level_db = -minimum_filter1d(-level_db, 2 * half + 1, origin=half)
    held_db = np.maximum.accumulate(level_db + release_db_per_s * TIME) - release_db_per_s * TIME
    r = np.exp(-1 / (attack_s * SR))
    duck_db = signal.lfilter([1 - r], [1, -r], squeeze * np.maximum(held_db - threshold_db, 0))
    clipped = np.clip(dry * from_db(-duck_db), -1, 1)
    return signal.sosfilt(signal.ellip(10, .1, 80, CUTOFF_HZ, fs=SR, output="sos"), clipped)


dry = scene()
out = record(dry)
dump_mix(out)
```